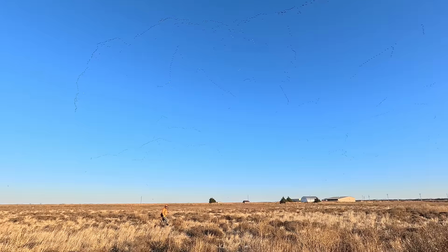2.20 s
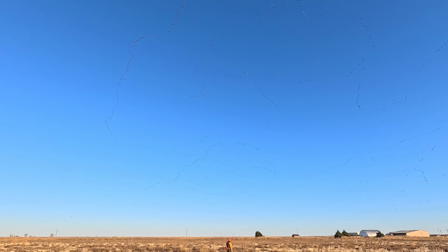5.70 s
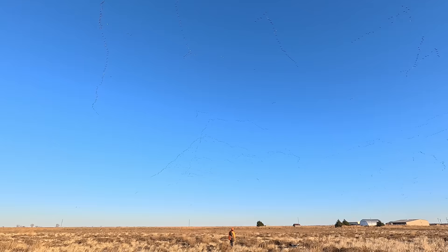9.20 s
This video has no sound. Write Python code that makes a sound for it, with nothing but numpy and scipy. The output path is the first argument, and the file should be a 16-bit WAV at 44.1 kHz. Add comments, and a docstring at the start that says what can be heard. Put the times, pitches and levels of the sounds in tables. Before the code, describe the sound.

Wind buffets an exposed handheld microphone in a wide field, its deep rumble swelling in short lumps. Behind it hundreds of geese call at once, blurring into a nasal chorus, with quick single honks overlapping on top, busiest through the middle. Dry stalks snap and brush at the start and again near six seconds, with a few soft handling-like knocks. Little echo and an almost centred image, widening slightly at the end.

```python
"""Wind, dry grass and the babble of a huge flock of geese over open grassland are there from the start.
A stalk snaps at once and more follow; from 0.2 s near geese stand out as short arched honks, and from 1 s
come short knocks, most of them dull, one a sharper tick at 5.9 s with a snap. Filtered noise makes wind
and hiss, clicks make crackle, wavering partials make the calls, and decaying sines make the knocks.
From about 8.2 s the two channels part a little."""
import sys
import numpy as np
from scipy import signal
from scipy.fft import rfft, irfft, next_fast_len
from scipy.io import wavfile

SR = 44100
rng = np.random.default_rng(int(sys.argv[2]) if len(sys.argv) > 2 else 0)


def voltage_ratio(level):
    """Linear amplitude factor for a level in decibels (scalar or array-like)."""
    return 10 ** (np.asarray(level, float) / 20)


def to_wav(s):
    """Save 16-bit WAV."""
    ch = np.atleast_2d(s).T  # columns
    pcm = np.round(np.clip(ch, -1, 1) * 32767)  # PCM
    wavfile.write(sys.argv[1], SR, pcm.astype(np.int16))


N = 411012   # length in samples

# Wind on the microphone. Each row: time in seconds, deep buffeting in dB, flutter in dB against it.
BREEZE_LEVELS = [(0.0, -42.5, -13.5), (0.98, -39.5, -10.5), (1.3, -39, -18.5), (1.74, -46, -3),
                 (2.44, -35.5, -4), (2.62, -32.5, -4), (3.09, -44, -6.5), (3.84, -38.5, -7),
                 (4.91, -39, -5), (5.16, -42, -9.5), (6.85, -45, -16), (7.17, -38, -13), (7.87, -44, -14),
                 (8.64, -46, -38), (8.98, -35, -20), (9.32, -42, -20)]
# Gusts that strike the microphone. Each row: peak in seconds, length in seconds, deep level in dB,
# flutter in dB against it.
GUST_SWELLS = [(0.085, 0.099, -36.5, -24), (0.41, 0.15, -42, 2), (0.568, 0.12, -34, -6),
               (1.304, 0.022, -36.5, 1), (2.11, 0.11, -31, -3), (2.266, 0.14, -31.5, -10),
               (2.591, 0.15, -31, -7), (2.813, 0.16, -36, -3), (3.635, 0.11, -37, -9),
               (3.851, 0.11, -31.5, -5), (4.268, 0.14, -31.5, -7), (4.513, 0.19, -40, 0),
               (4.772, 0.18, -34.5, -25), (5.043, 0.035, -29.5, -24), (5.587, 0.03, -36, -6),
               (5.942, 0.061, -30.5, -13), (6.546, 0.083, -45, -4), (7.145, 0.16, -31.5, -24),
               (7.552, 0.041, -47, -17), (8.066, 0.057, -36, -14), (8.914, 0.17, -42, -26)]
# Loudness of the far flock. Each row: time in seconds, level in dB.
FLOCK_LEVELS = [(0.0, -58.5), (0.28, -56), (0.57, -46), (1.22, -57), (2.1, -50), (3.48, -49), (3.66, -53),
                (4.28, -48.5), (4.44, -43.5), (4.62, -51), (5.48, -51), (5.84, -56.5), (6.07, -52),
                (6.26, -48), (7.53, -54.5), (7.94, -55), (8.07, -57), (8.36, -58), (8.85, -48.5),
                (9.32, -52)]
# Throat colour of the far flock. Each row: frequency in Hz, gain in dB.
THROAT_COLOUR = [(500, -17), (700, -1), (1000, 5.5), (1400, 1), (1750, -3), (2200, -7), (3000, -15.5),
                 (4500, -27), (6000, -26.5)]
# Grass stirring. Each row: time in seconds, level of its treble in dB.
GRASS_LEVELS = [(0.0, -65.5), (0.6, -73.5), (1.3, -69), (1.55, -75.5), (1.97, -79.5), (3.03, -78),
                (3.11, -81.5), (4.15, -79.5), (4.62, -71), (5.16, -80.5), (5.94, -69), (6.46, -78),
                (7.06, -76), (8.33, -80.5), (8.77, -82), (9.32, -84.5)]
# Something brushes through the stalks. Each row: peak in seconds, length in seconds, treble in dB.
BRUSH_SWELLS = [(0.01, 0.061, -55.5), (0.196, 0.042, -65.5), (0.603, 0.052, -65.5), (0.966, 0.081, -64.5),
                (1.095, 0.071, -64.5), (1.317, 0.29, -66.5), (1.965, .06, -71), (2.194, 0.16, -73.5),
                (2.868, 0.2, -72), (3.427, 0.21, -75.5), (4.65, 0.13, -68.5), (5.01, 0.087, -73.5),
                (5.57, 0.05, -65), (6.021, 0.032, -61.5), (6.126, 0.053, -64.5), (6.654, 0.12, -64.5),
                (6.908, 0.23, -69), (7.26, 0.16, -71), (7.524, 0.14, -70), (7.812, 0.094, -72),
                (8.06, 0.12, -69.5), (8.83, 0.046, -68.5)]
# Colour of rubbing stalks. Each row: frequency in Hz, gain in dB.
RUSTLE_COLOUR = [(500, 6.5), (1200, 13), (2500, 1), (4000, -2), (6500, -9), (8500, -7.5), (11000, -14),
                 (13000, -14.5), (15000, -21)]
# Dry stalks breaking. Each row: start in seconds, level in dB.
STALK_SNAPS = [(0.0365, -24.5), (0.1205, -41.5), (0.193, -45), (0.274, -48), (0.3278, -41), (0.3676, -51),
               (0.956, -45), (1.292, -44), (1.7346, -47), (1.8143, -46.5), (1.964, -46), (2.8173, -43),
               (3.105, -51), (4.4962, -48), (4.664, -43), (5.6202, -53), (5.915, -40.5), (6.008, -44),
               (6.02, -35.5), (6.276, -50.5), (6.37, -46), (6.645, -41), (6.684, -37.5), (6.801, -46.5),
               (7.1895, -46.5), (7.5904, -45), (8.316, -63), (9.185, -51.5)]
# Near honks. Each row: start in seconds, length in seconds, strongest partial's start pitch in Hz,
# its end pitch in Hz, its level in dB, overtones in dB against it.
NEAR_HONKS = [(0.217, 0.07, 1411, 1360, -48.5, -13), (0.38, 0.036, 1357, 1315, -51, -13.5),
              (0.423, 0.091, 1120, 1067, -55.5, -29), (0.57, 0.12, 1575, 1366, -57.5, -8),
              (0.668, 0.096, 1640, 1630, -51, -33), (0.789, 0.062, 1500, 1440, -55, -7),
              (1.066, 0.025, 1780, 1854, -53, -25), (1.237, 0.019, 1690, 1723, -52, -30),
              (1.415, 0.025, 1767, 1750, -52, -30), (1.469, .045, 1724, 1700, -51.5, -21),
              (1.566, 0.05, 1870, 1903, -56.5, -33), (1.617, 0.044, 1668, 1810, -52, -22),
              (1.765, 0.064, 696, 698, -53.5, -18), (1.806, 0.014, 1047, 1130, -50, -8),
              (1.82, 0.037, 1430, 1333, -48.5, -24), (1.879, 0.034, 1944, 1813, -53.5, -11.5),
              (1.965, 0.04, 1396, 1435, -62, -13), (2.005, 0.025, 1956, 2062, -53, -10.5),
              (2.032, 0.0095, 2010, 1830, -75, -10), (2.235, 0.038, 1750, 1762, -61, -28),
              (2.244, 0.096, 1467, 1483, -57, -31), (2.38, 0.06, 1843, 1890, -55, -24),
              (2.451, 0.08, 1510, 1483, -56.5, -12), (2.52, 0.061, 1390, 980, -53, -34),
              (2.647, 0.062, 1208, 1110, -50, -42), (2.691, 0.12, 852, 803, -52, -32),
              (2.806, 0.056, 1766, 1770, -55, -33), (2.921, 0.044, 1743, 1752, -51.5, -30),
              (2.95, 0.06, 1495, 1547, -58.5, -4.5), (2.99, 0.1, 2130, 1970, -57, -9.5),
              (3.086, 0.053, 1490, 1410, -59, -1.5), (3.253, 0.037, 1528, 1510, -52.5, -9),
              (3.278, 0.084, 1823, 1930, -50, -21), (3.337, 0.058, 1090, 1132, -50.5, -12),
              (3.398, 0.056, 1438, 1357, -49.5, -10), (3.41, 0.067, 1720, 1310, -57.5, 1.5),
              (3.584, 0.063, 1150, 1480, -49.5, -11.5), (3.867, 0.11, 1737, 1682, -46, -21),
              (4.035, 0.031, 1420, 1350, -53, -7.5), (4.245, 0.079, 1532, 1368, -48, -9),
              (4.325, 0.15, 1495, 1513, -48.5, -16), (4.369, .041, 1224, 1225, -54, -26),
              (4.398, 0.073, 1700, 1734, -44.5, -10.5), (4.551, 0.056, 1690, 1690, -52, -11),
              (4.721, 0.073, 2094, 1930, -56, -12), (4.853, 0.046, 1957, 1860, -54.5, -23),
              (4.812, 0.097, 1140, 1140, -53.5, -18), (5.028, 0.055, 1294, 1290, -54, -16),
              (5.042, 0.075, 1734, 1784, -52, -27), (5.114, 0.024, 1327, 1305, -51.5, -25),
              (5.228, 0.028, 1493, 1596, -56.5, 1.5), (5.264, 0.093, 1835, 1474, -50, -11),
              (5.271, 0.12, 1713, 1720, -52.5, -24), (5.317, 0.055, 1285, 1480, -53, -17),
              (5.385, 0.044, 1695, 1840, -47.5, -15.5), (5.425, 0.049, 1910, 1923, -49, -23),
              (5.564, 0.076, 1640, 1560, -60, -28), (5.629, 0.04, 1410, 1290, -54, -9.5),
              (5.649, 0.043, 1335, 1270, -53, -26), (5.69, 0.043, 1860, 1905, -51, -29),
              (5.738, 0.037, 2515, 2280, -58, -25), (5.84, 0.052, 1980, 2010, -57.5, -30),
              (6.015, 0.048, 1730, 1680, -55, -22), (6.063, 0.046, 1300, 1290, -50.5, -9),
              (6.194, 0.073, 1562, 1447, -47.5, -18), (6.232, 0.072, 1702, 1694, -46.5, -23),
              (6.33, 0.092, 1856, 1787, -51, -16), (6.389, 0.051, 1274, 1333, -58, 1.5),
              (6.441, 0.045, 1410, 1366, -47, -5), (6.481, 0.035, 4960, 4400, -56.5, -32),
              (6.612, 0.07, 1870, 1886, -57, -23), (6.655, 0.045, 1383, 1480, -52.5, -14),
              (6.844, 0.038, 1420, 1390, -52, -23), (6.911, 0.082, 1386, 1336, -50.5, -14.5),
              (7.158, 0.16, 692, 842, -57, -29), (7.659, 0.052, 1028, 938, -54.5, -12.5),
              (7.705, 0.059, 1314, 1230, -56, -18), (7.729, 0.084, 855, 757, -54.5, -15),
              (7.745, 0.092, 1667, 1360, -53, -24), (7.843, 0.042, 1129, 1120, -54, -18),
              (7.954, 0.082, 2066, 1894, -57.5, -14), (7.985, 0.04, 1014, 1093, -54.5, -22),
              (8.085, 0.035, 1760, 1790, -61.5, -16), (8.279, 0.033, 1410, 1370, -59, -8),
              (8.338, 0.012, 1310, 1330, -57, -9), (8.387, 0.0087, 1395, 1476, -48.5, -4.5),
              (8.403, 0.015, 1815, 1780, -54.5, -12), (8.528, 0.057, 1416, 1373, -57, -16),
              (8.6, 0.031, 1960, 1994, -68, -3), (8.602, 0.068, 1063, 1114, -55, -21),
              (8.631, 0.021, 1640, 1710, -53.5, -42), (8.786, 0.051, 1260, 1380, -62, -41),
              (8.864, 0.062, 1417, 1418, -50.5, -27), (8.869, 0.038, 1780, 1620, -53, -27),
              (8.87, 0.066, 709, 700, -52.5, -17), (8.969, 0.056, 1914, 1780, -62, -9),
              (8.892, 0.065, 1270, 1286, -48, -20), (9.06, 0.048, 1125, 1130, -58, -25),
              (9.07, 0.1, 1886, 1830, -68, -20)]
# Short knocks, most of them dull. Each row: time in seconds, level in dB, ring in Hz.
SHORT_KNOCKS = [(0.997, -33, 450), (1.11, -32.5, 560), (1.294, -19.5, 192), (1.654, -29.5, 412),
                (1.795, -25.5, 573), (2.815, -18, 247), (5.916, -30, 1700), (7.529, -30, 293)]
# Unshared part of the channels. Each row: time in seconds, share of the wind, share of the field sounds.
CHANNEL_PARTING = [(8.17, 0, 0.0015), (8.25, 0.087, 0.0083), (8.55, 0.037, 0.021), (8.8, 0.27, 0.098),
                   (9.32, 0.12, 0.059)]

FAR_CALLS_PER_S = 140
RISE_SHARE = 0.42   # a swell rises in this share of the time it takes to fall
ARCH = 0.01223   # the pitch bulges by this share in mid-call
DWELL = 0.2425   # a glide's mid pitch sits nearer its high end, by this share of its span


def rms_one(x):
    """Bring a signal to an rms of 1."""
    return x / np.sqrt(np.mean(x ** 2) + 1e-20)


def in_time(rows):
    """Join each column of a timed table by straight lines."""
    s, *columns = np.transpose(rows)
    return [np.interp(np.arange(N) / SR, s, c) for c in columns]


def at_hz(points, hz):
    """Read a dB curve at any frequency, straight over log frequency."""
    point_hz, point_db = np.array(points)[:, 0], np.array(points)[:, 1]
    return np.interp(np.log(hz), np.log(point_hz), point_db)


def drift(rate, count=N):
    """Slow chance: random points of spread 1, rate per second, joined by straight lines."""
    knots = rng.standard_normal(int(40 + N / SR * 400))
    return np.interp(np.arange(count) * rate / SR, np.arange(len(knots)), knots)


def band(x, low_hz, high_hz, order=2):
    """Keep what lies between two frequencies."""
    return signal.sosfilt(signal.butter(order, [low_hz, high_hz], "band", fs=SR, output="sos"), x)


def coloured(x, points):
    """Shape a signal by a spectrum in dB."""
    size = next_fast_len(N)
    hz = np.arange(size // 2 + 1) * SR / size + 1
    return irfft(rfft(x, size) * voltage_ratio(at_hz(points, hz)), size)[:N]


def add(out, start_s, sound):
    """Mix a sound in at its start time, trimmed to the scene."""
    at = int(start_s * SR)
    low, high = np.clip([at, at + len(sound)], 0, N)
    out[low:high] += sound[low - at:high - at]


def with_swells(floor_db, rows):
    """Bell-shaped swells (peak s, length s, dB) add their power to a slow level."""
    s, length, db = np.transpose(rows)[:, :, None]
    coarse = np.arange(0, N, 64)
    t = coarse / SR - s
    side_length = length * np.where(t < 0, RISE_SHARE, 1)
    bells = voltage_ratio(2 * db) * np.exp(-(2 * t / side_length) ** 2)
    swell_power = np.interp(np.arange(N), coarse, bells.sum(axis=0))
    return 10 * np.log10(voltage_ratio(2 * floor_db) + swell_power)


def wind(deep_db, flutter_db):
    """Eddies hit the port in lumps: noise whose strength jumps some tens of times a second."""
    lumps = 1.0 * drift(14) + 0.45 * drift(45)
    deep = rms_one(band(rng.standard_normal(N), 13.3, 71.0)) * voltage_ratio(deep_db + 2.0 * lumps)
    flutter = rms_one(band(rng.standard_normal(N), 96, 196.3))
    flutter = flutter * voltage_ratio(flutter_db + 1.67 * lumps + 2.0 * drift(40))
    return deep + flutter


def honk(length_s, start_hz, mid_hz, end_hz, partials, rough):
    """An arched, wavering pitch drives partials (multiple, gain); each flutters, high ones most."""
    u = np.linspace(-1, 1, int(length_s * SR))   # -1 at the start, 1 at the end
    arch = mid_hz + u * (end_hz - start_hz) / 2 + u ** 2 * ((start_hz + end_hz) / 2 - mid_hz)
    arch = arch * (1 - .05 * u ** 6)   # the voice scoops in and drops out
    knots = rng.standard_normal((7, 40))
    waver, *flutter = [np.interp((u + 1) * length_s * 90, np.arange(40), k) for k in knots]
    phase = 2 * np.pi * np.cumsum(arch * (1 + 0.015 * rough * waver)) / SR
    swell = np.clip(np.abs(1 - u ** 2) * 3.28, 1e-9, 1) ** 1.9
    tone = 0
    for (multiple, gain), shake in zip(partials, flutter):
        hoarse = np.clip(rough * (0.21 + 0.2 * multiple * mid_hz / 1000), 0, .7)
        strength = np.sqrt(1 - hoarse ** 2) + hoarse * shake
        tone = tone + gain * strength * np.sin(multiple * phase)
    # uneven cycles rasp
    grit = np.interp((u + 1) * length_s * 250, np.arange(120), rng.standard_normal(120))
    return tone * swell * (1 + .45 * rough * grit)


def open_air(x):
    """The ground sends back a few faint, dull echoes."""
    out, dull = x.copy(), signal.lfilter([.4], [1, -.6], x)
    for lag_s, db in [(.009, -10), (.031, -15), (.067, -19)]:
        add(out, lag_s, voltage_ratio(db) * dull)
    return out


def far_flock(level_db):
    """Honks at chance times, pitches and distances blur together through one throat colour."""
    out = np.zeros(N)
    chances = rng.random((int(FAR_CALLS_PER_S * N / SR), 7))
    for when, pitch, distance, bend, tilt, length, odd in chances:
        mid = 640 * (1080 / 640) ** pitch
        start, end = mid * (1 - .16 * bend + .26 * (tilt - .5) * np.array([1, -1]))
        # each voice weakens its odd partials by its own amount
        partials = [(k, voltage_ratio(-14 * odd * (k % 2) - 0.051 * max(k - 2, 0))) for k in range(1, 7)]
        call = honk(0.035 + .08 * length ** 2, start, mid, end, partials, rough=.8)
        add(out, when * N / SR - .1, voltage_ratio(-11 * distance) * call)
    blur = voltage_ratio(-9) * rms_one(band(rng.standard_normal(N), 650, 6500))
    babble = rms_one(open_air(out)) + blur
    return voltage_ratio(level_db) * rms_one(coloured(babble, THROAT_COLOUR))


def rustle(level_db):
    """Stalks rub in clumps of tiny clicks, each ringing briefly at one of eight pitches, over soft hiss."""
    clump = .9 * drift(9) + .5 * drift(30)
    sizes = voltage_ratio(3.3 * np.minimum(rng.exponential(1, N), 4)) * rng.choice([-1, 1], N)
    struck = rng.random(N) < 900 * voltage_ratio(5.0 * clump) / SR   # about 900 a second, more in a clump
    clicks = sizes * struck + 1e-18
    dealt, pitches = rng.integers(0, 8, N), np.geomspace(1500, 11000, 8)
    crackle = sum(band(clicks * (dealt == k), hz / 1.13, hz * 1.13) / hz for k, hz in enumerate(pitches))
    crackle = np.diff(crackle, prepend=0)   # small stalks ring brighter
    hiss = rng.standard_normal(N) * voltage_ratio(1.6 * clump)
    grass = coloured(rms_one(crackle) * voltage_ratio(-1) + hiss, RUSTLE_COLOUR)
    return voltage_ratio(level_db) * grass / np.std(band(grass, 6000, 12000))   # level set by the treble


def snaps():
    """Each break is a broad tick with a short ring at a pitch of its own."""
    out, t = np.zeros(N), np.arange(int(0.017 * SR)) / SR
    for (s, db), noise in zip(STALK_SNAPS, rng.standard_normal((len(STALK_SNAPS), len(t)))):
        ring = np.sin(2 * np.pi * 5000 * voltage_ratio(3.9 * noise[0]) * t)
        tick = .8 * noise * np.exp(-t / .0022)
        add(out, s, voltage_ratio(db) * (.5 * ring * np.exp(-t / .0015) + tick))
    return band(out, 2100, 9500, order=1)


def near_birds():
    """Arched honks, each with a breathy rasp that trails off.

    The bill dulls overtones gently up to about 4.4 kHz and strongly above 5 kHz."""
    out, breath = np.zeros(N), rms_one(band(rng.standard_normal(N), 2400, 4740))
    bill = [(2000, -2), (3000, -3), (3600, -7), (4400, -6), (5200, -12), (6500, -28)]   # (Hz, dB)
    for s, length, start, end, db, over_db in NEAR_HONKS:
        mid = (start + end) / 2 * (1 + ARCH) + DWELL * abs(end - start)
        half_db = over_db / 2 - 5 if mid > 1520 else -25   # half-pitch partials, mostly in high voices
        multiples = (2, 3, 4) if mid < 1800 else (3 / 2, 2, 5 / 2, 3)
        overtones = [(k, voltage_ratio(over_db + at_hz(bill, k * mid))) for k in multiples]
        partials = [(1, 1), (.5, voltage_ratio(half_db)), (3 / 2, voltage_ratio(half_db))] + overtones
        add(out, s - .008, voltage_ratio(db + 3) * honk(length + .02, start, mid, end, partials, rough=.6))
        t = np.arange(int(.2 * SR)) / SR / (.6 * length + .01)   # 1 at the rasp's peak
        add(out, s, voltage_ratio(db + over_db) * t * np.exp(-t) * breath[int(s * SR):][:len(t)])
    return out


def knocks():
    """A short ring, mostly low and dull, swells for half a cycle and soon dies away."""
    out = np.zeros(N)
    for s, db, hz in SHORT_KNOCKS:
        cycles = np.arange(int(.04 * SR)) * hz / SR
        ring = np.sin(2 * np.pi * cycles) * cycles * np.exp(-2.0 * cycles)
        add(out, s - .5 / hz, voltage_ratio(db + 8.0) * ring)
    return out


def scene():
    """Nearly everything reaches both channels alike; late on they part a little, the wind first."""
    deep_db, flutter_db = in_time(BREEZE_LEVELS)
    (flock_db,), (grass_db,) = in_time(FLOCK_LEVELS), in_time(GRASS_LEVELS)
    deep = with_swells(deep_db, [(s, length, db) for s, length, db, _ in GUST_SWELLS])
    flutter_gusts = [(s, length, db + above) for s, length, db, above in GUST_SWELLS]
    gusts = wind(deep, with_swells(deep_db + flutter_db, flutter_gusts))
    grass = rustle(with_swells(grass_db, BRUSH_SWELLS))
    field = far_flock(flock_db) + grass + snaps() + open_air(near_birds()) + knocks()
    wind_share, field_share = in_time(CHANNEL_PARTING)
    # copies 0.2 s late, opposite in the two channels, stand for the unshared part
    field_apart = coloured(np.roll(field, SR // 5), [(600, -5), (2000, 3), (5000, 4)])
    side = wind_share * np.roll(gusts, SR // 5) + field_share * field_apart
    mid = gusts + field
    return np.array([mid + side, mid - side])


def top_cut(x):
    """Nothing passes above the cut-off."""
    return signal.sosfilt(signal.butter(12, 15520, fs=SR, output="sos"), x)


def record(dry):
    """The treble above about 11 kHz is louder on the left and only partly shared; the top is cut."""
    centre = dry.mean(axis=0)
    top = signal.sosfilt(signal.butter(8, 11200, "high", fs=SR, output="sos"), centre)
    shared = centre - signal.sosfiltfilt(signal.butter(6, 11200, "low", fs=SR, output="sos"), centre)
    side = .28 * shared + .7 * np.roll(top, 700)   # the late copy is the unshared part
    mix = signal.sosfilt(signal.butter(8, 13800, fs=SR, output="sos"), dry + side * [[1], [-1]])
    return top_cut(mix)


dry = scene()
out = record(dry)
to_wav(out)
```